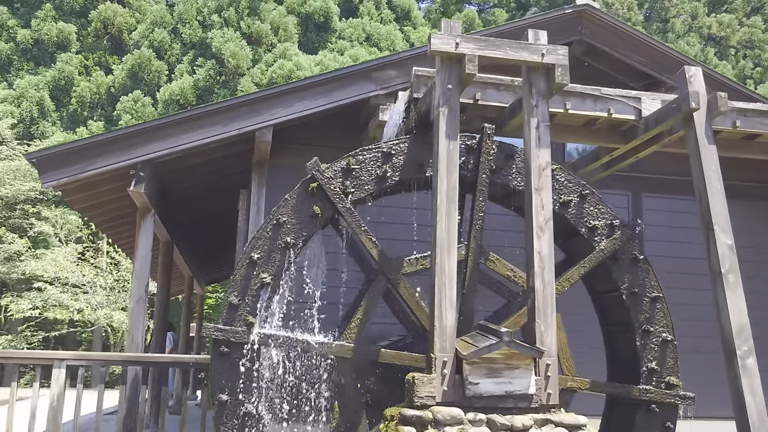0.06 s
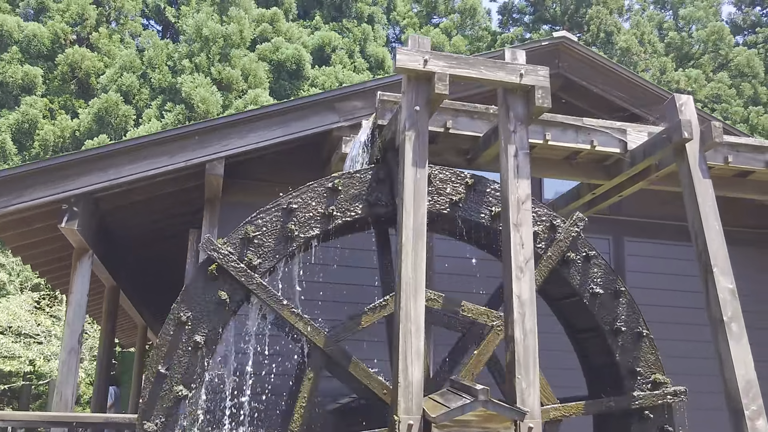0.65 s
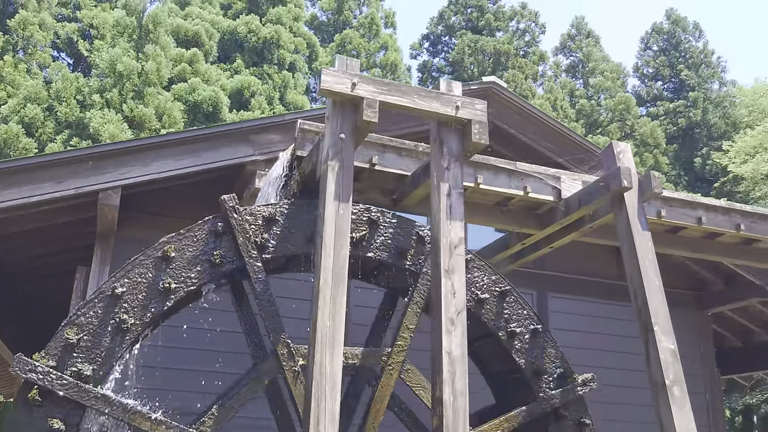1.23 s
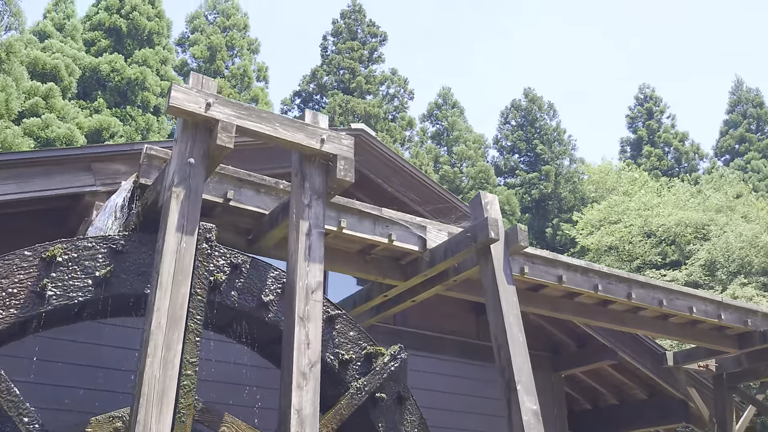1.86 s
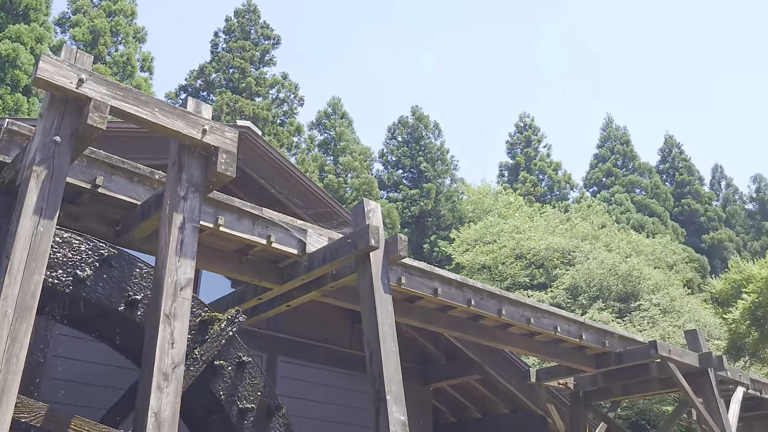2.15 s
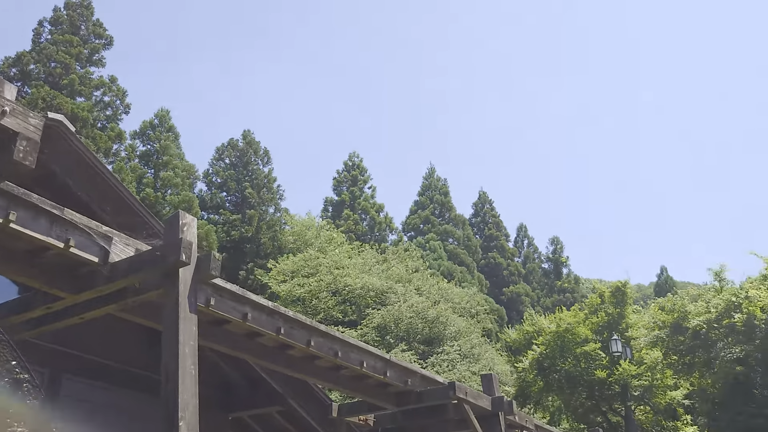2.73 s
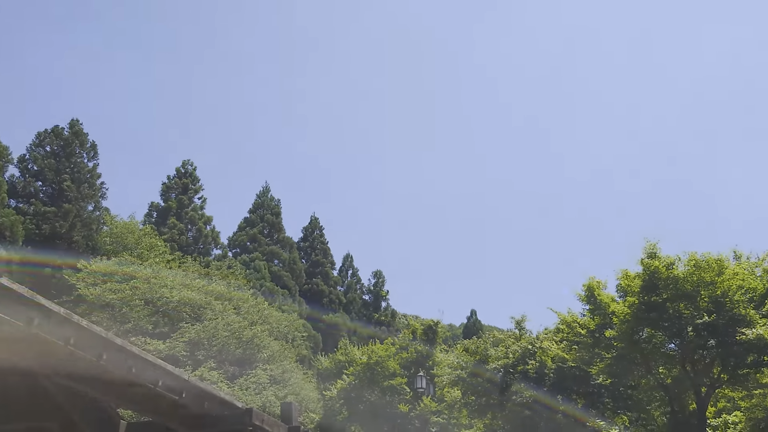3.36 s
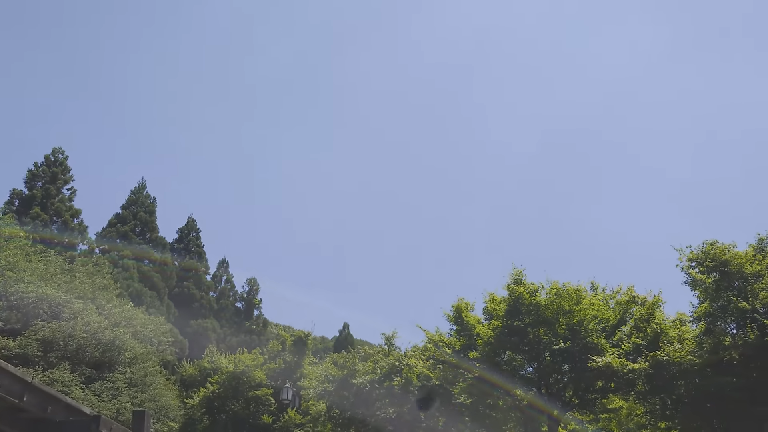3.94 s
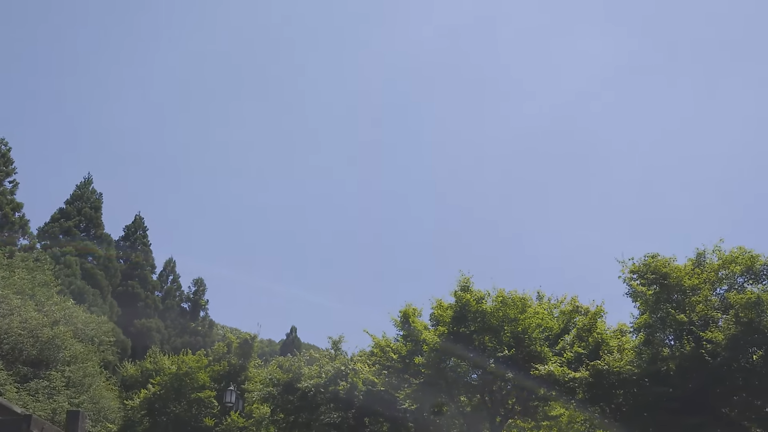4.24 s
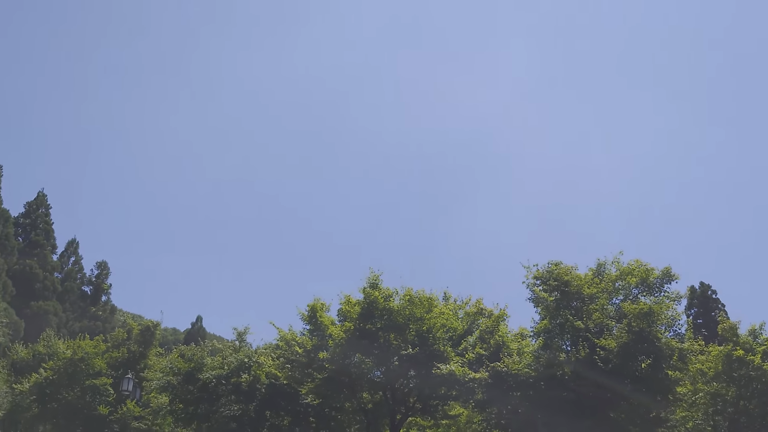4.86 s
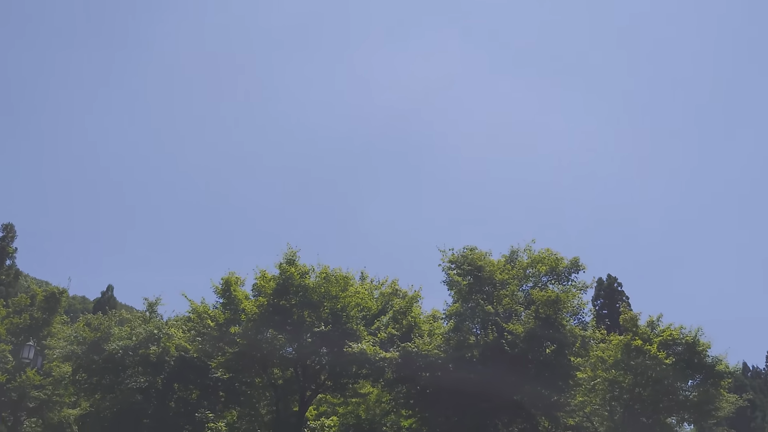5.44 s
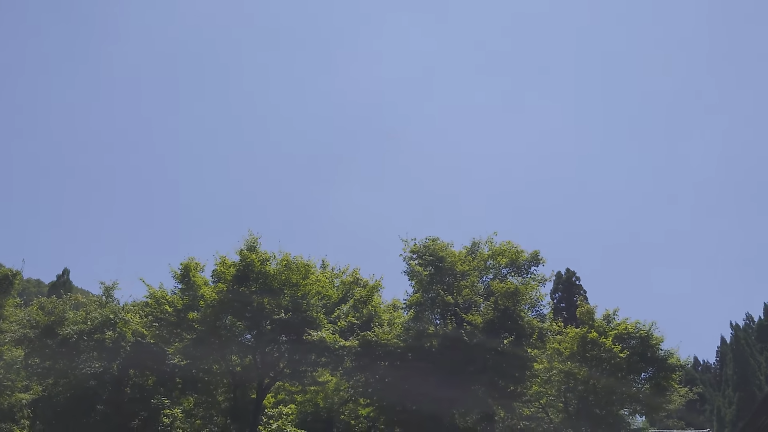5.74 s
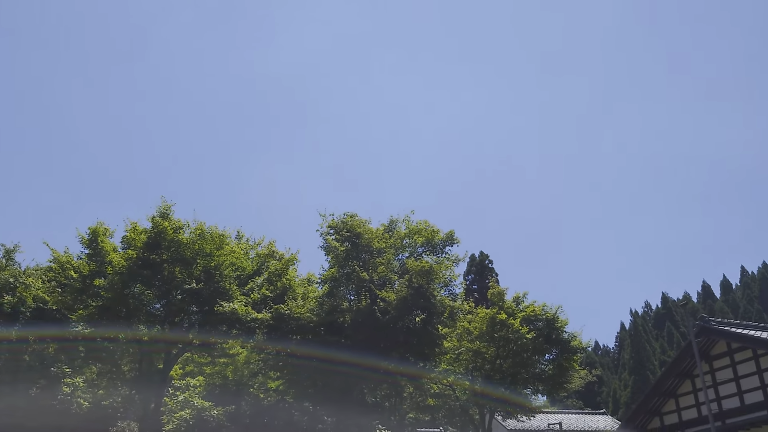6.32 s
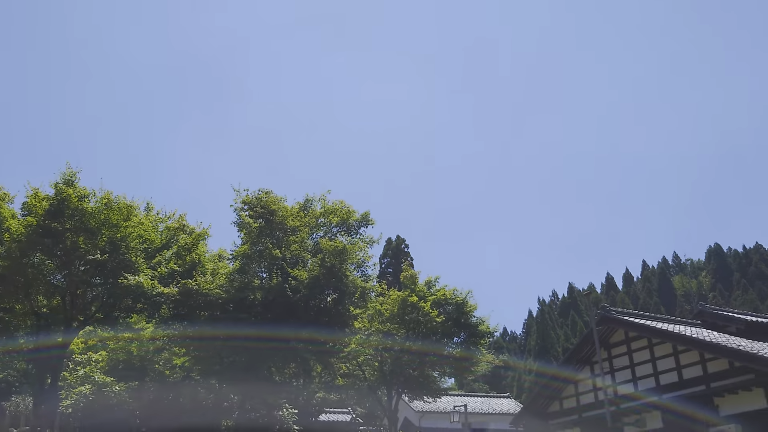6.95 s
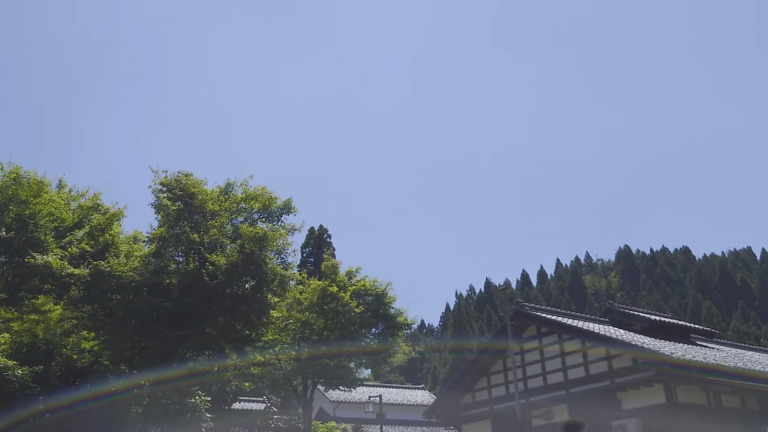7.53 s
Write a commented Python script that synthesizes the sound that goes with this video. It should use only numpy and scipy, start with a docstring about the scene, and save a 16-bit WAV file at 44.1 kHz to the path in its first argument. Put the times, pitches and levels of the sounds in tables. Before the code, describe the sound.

Water pours off a large wooden waterwheel outdoors, continuously for nearly eight seconds. It splashes and bubbles into a pool, with a bright hiss of pattering spray and a thin, tinkling trickle. Underneath, a channel rushes dully and gurgles, growing slightly fuller in the second half. Small slops and sharp, high drips on wet boards come irregularly, with the clearest drips near 1.6, 2.7, 2.9 and 7.2 seconds. The buckets spill brief gushes around 0.9 and 1.8 seconds, then the splashing and spray are strongest and brightest from about 2.3 to 3.2 seconds. The flow eases by 4 seconds, with smaller surges near 5 and 7. The microphone turns slowly right, so the water drifts left and changes slightly in tone. A light breeze rumbles on the microphone throughout, with soft puffs, the strongest at about 2.4 seconds and another at 3.5.

```python
"""Water pouring off a waterwheel

A large wooden wheel turns outdoors. Its buckets empty into a pool with bubbling splashes, a bright
spray of droplets and a few sharp drips, while the channel below rushes steadily. The microphone turns
slowly to the right, so the wheel drifts left. A breeze rumbles on its two ports (its sound openings)."""
import sys
import numpy as np
from scipy import signal
from scipy.fft import rfft, irfft
from scipy.io import wavfile

SR = 44100
rng = np.random.default_rng(int(sys.argv[2]) if len(sys.argv) > 2 else 0)


def wav_record(signal):
    """Record a signal, one row per channel, as 16-bit PCM in the file named by sys.argv[1]."""
    frames = np.transpose(np.atleast_2d(signal))
    bounded = np.clip(frames, -1, 1)
    # unit amplitude maps onto the largest positive 16-bit level
    quanta = np.round(bounded * 32767).astype(np.int16)
    wavfile.write(sys.argv[1], SR, quanta)


N = 339129
TIME = np.arange(N) / SR
HOP = 128  # samples from one short slice of sound (a frame) to the next
BIN_HZ = np.fft.rfftfreq(4 * HOP, 1 / SR)[:, None]
FRAME_S = np.arange(-(-N // HOP) + 1) * HOP / SR


def splashes(boost_db=2.5, bubble_db=-12, swell_db=0.6):
    """Ropes of water slap the pool in clumps and push bubbles under."""
    # tone of the splashing: frequency_hz, gain_db
    tone = [(350, -25), (700, -10), (1170, -15), (1450, -2), (2000, 1.5), (2500, 0), (3200, -9),
            (6600, -16.5)]
    slaps = amp(0.4 * patches(span_hz=900, span_s=0.061))
    froth = wash() + amp(bubble_db) * bubbles(1133, 2880, per_s=500, spread_db=-0.5, cycles=12.1,
                                              rise=0.0314)
    thickness_db = swell_db * wander(span_s=0.051)  # the ropes thicken and thin
    return poured(froth * slaps, tone, boost_db + flow(column=1) + thickness_db)


def slops(boost_db=4, rise_s=0.0054, decay_s=0.025, width_octaves=0.38):
    """A lump of water tips from a bucket into the pool: hollow when large, bright when small."""
    # lumps hitting the pool: start_s, level_db, pitch_hz
    lumps = [(.345, -41, 5200), (1.32, -37, 1530), (1.81, -38, 1900), (2.06, -38.5, 1720),
             (2.54, -37, 2000), (2.922, -38.5, 1710), (3.165, -41, 1820), (3.93, -39, 1950),
             (4.535, -37, 2090), (5.018, -36, 2120), (5.148, -37.5, 2180), (5.984, -37.5, 1910),
             (6.145, -45, 1950), (6.422, -36, 2040), (7.145, -43, 2000)]
    out = 0
    for start_s, level_db, pitch_hz in lumps:
        band = np.exp(-.5 * (np.log2((BIN_HZ + 1) / pitch_hz) / width_octaves) ** 2)
        froth = unit(sound(wash() * band))
        age = np.maximum(TIME - start_s, 0)
        envelope = (1 - np.exp(-age / rise_s)) * np.exp(-age / decay_s)
        out = out + amp(level_db + boost_db) * froth * envelope
    return out


def spray(boost_db=2.5, plink_db=-9, fizz_db=3):
    """Droplets patter and plink in small showers over the fine hiss of the mist."""
    # tone of the spray: frequency_hz, gain_db
    tone = [(750, -31.5), (1500, -14.5), (3200, -5.5), (4500, -5), (5300, -6), (6300, -2.5), (6950, 1.5),
            (7450, -1), (8000, -5.5), (8800, -7.5), (10500, -5), (13000, -8), (15500, -13.5)]
    clicks = unit(impacts(per_s=2400, spread_db=1.5, scatter_s=.00003))
    drops = spectra(clicks) * amp(3.3 * patches(span_hz=1490, span_s=0.02))
    shatter = fade_after(clicks ** 2, decay_s=0.0079)  # each drop breaks into a fizz of smaller ones
    fizz = unit(np.sqrt(shatter) * sound(wash()))
    plinks = bubbles(3866, 7360, per_s=800, spread_db=1, cycles=7.1, rise=0.005)
    mist = wash()
    patter = sound(drops + amp(plink_db) * plinks + mist) + amp(fizz_db) * fizz
    patter *= showers(per_s=55, decay_s=0.023, depth=0.16)
    return poured(spectra(patter), tone, boost_db + flow(column=2))


def drips(boost_db=3, splat_db=-6, attack_s=0.00016, settle_db=-23, settle_s=0.017):
    """A large drop hits the wet boards: a short ring, a puff of splatter, then droplets settling."""
    # large drops: start_s, level_db, pitch_hz, left_minus_right_db, ring_decay_s, splat_decay_s
    large_drops = [(0.118, -27, 4600, -3, 0.00047, .0007), (.4163, -32, 7000, 2, .0008, .001),
                   (1.0745, -34, 7300, -2, .0011, .002), (1.572, -19, 7670, -4, 0.00065, 0.0013),
                   (1.6423, -36, 4700, -8, .001, .001), (1.913, -32, 6900, -3, .0008, .0007),
                   (1.9688, -25, 5300, 20, 0.00068, .0004), (2.082, -33, 11000, -3, .001, .002),
                   (2.188, -26, 7300, -5, .0011, .003), (2.316, -28, 6600, -4, .0011, .004),
                   (2.399, -25, 4700, 4, 0.00095, 0.0006), (2.4955, -25, 4800, 3, .0014, .0007),
                   (2.658, -20.5, 6730, 2, 0.0017, .003), (2.77, -26, 4680, 3, .0016, .0005),
                   (2.868, -29, 4680, 3, .0016, .0005), (2.9395, -19, 7200, 0, 0.0023, .0045),
                   (3.052, -30, 4750, 0, .0016, .0005), (3.082, -33, 4650, 3, .0016, .0005),
                   (3.1402, -33, 4700, 2, .001, .001), (3.477, -27, 7000, 0, .0013, .002),
                   (3.573, -30, 4770, -3, .0022, .0005), (3.624, -24, 6900, -3, 0.0016, 0.00099),
                   (3.749, -34, 4550, 2, .0016, .0008), (3.7647, -25, 4800, -1, .001, .003),
                   (3.951, -28, 4900, 5, .0004, .0005), (4.0512, -29.5, 4200, 3, .0009, .001),
                   (4.3775, -25, 5770, 3, 0.00099, 0.0019), (4.496, -25, 6700, 6, .0011, .002),
                   (4.718, -32, 6290, 0, .0011, .002), (4.7995, -26, 6540, 3, .0011, .001),
                   (4.8315, -25, 4940, 19, 0.0015, 0.00054), (5.0303, -32, 6900, 4, .001, .001),
                   (5.5565, -35, 4900, -2, .0007, .0007), (6.025, -26.5, 4500, -2, 0.0013, .002),
                   (6.114, -25, 5000, 15, .0006, .0006), (6.3775, -29, 6100, 5, .0011, .001),
                   (6.9414, -26.5, 4200, -1, .0011, .0011), (7.064, -27.5, 6400, -3, .0008, .001),
                   (7.1074, -25, 6400, -2, .0008, .001), (7.221, -22.5, 6300, -10, .0011, .001),
                   (7.256, -22, 7800, -3, 0.00086, 0.0022)]
    t, out = np.arange(16 * HOP) / SR, np.zeros((2, N))
    bright = signal.butter(1, [4500, 15000], "band", fs=SR)
    for start_s, level_db, pitch_hz, pan_db, ring_s, splat_s in large_drops:
        ring = np.sin(2 * np.pi * pitch_hz * t) * np.exp(-t / ring_s)
        fade = amp(splat_db) * np.exp(-t / splat_s) + amp(settle_db) * np.exp(-t / settle_s)
        splat = unit(signal.lfilter(*bright, rng.standard_normal((2, len(t))))) * fade
        drop = (ring + splat) * (1 - np.exp(-(t / attack_s) ** 2))
        at = round(start_s * SR)
        out[:, at:at + len(t)] += drop / abs(drop).max() * amp(level_db + boost_db) * sides(pan_db)
    return out


def trickle(gain_db=-13):
    """Thin threads of water run off the rim as separate, ringing droplets."""
    tinkle = bubbles(4340, 4930, per_s=40, spread_db=-1, cycles=15, rise=0.002, count=8)
    return unit(sound(tinkle)) * amp(gain_db + flow(column=2))


def channel(gurgle_db=-14, swell_db=0.68):
    """Water rushes dully along the channel under the wheel, with large bubbles gurgling in it."""
    # tone of the rush: frequency_hz, gain_db
    tone = [(85, -14), (170, -14.5), (260, -18), (340, -4), (460, -3.5), (750, -1.5), (1100, 0.5),
            (1800, -3), (3200, -17.5), (6400, -11)]
    # slow drift in its loudness: time_s, level_db
    drift = [(0, -47.5), (1.1, -49), (2.3, -48.5), (3.8, -44), (6, -46), (7.69, -44.5)]
    churn = amp(0.96 * patches(span_hz=159, span_s=0.26))
    gurgle = bubbles(405.3, 1303, per_s=260, spread_db=2, cycles=16.3, rise=0.011)
    rush = (wash() + amp(gurgle_db) * gurgle) * churn
    return poured(rush, tone, curve(drift, TIME) + swell_db * wander(span_s=0.063))


def flow(column, rise_s=0.013, drain_s=0.033):
    """Level in dB of the splash (column 1) or spray (column 2): a steady fall plus brief gushes."""
    # the steady fall of water: time_s, splash_db, spray_db
    fall = [(0, -44, -45.5), (1.45, -42, -45.5), (2.15, -41.5, -42.5), (2.45, -43.5, -37.5),
            (2.8, -42, -36), (3.3, -43, -39.5), (3.8, -43.5, -40.5), (4.2, -45, -46.5), (4.7, -45, -43),
            (5.45, -45.5, -42.5), (6.75, -44.8, -43.5), (7.69, -43.5, -43)]
    # a bucket spills more than usual: start_s, length_s, extra_splash_db, extra_spray_db
    gushes = [(0.844, 0.12, 4, 1.5), (1.062, .05, 1.5, 2.5), (1.608, 0.08, 2.5, 2.5), (1.784, .09, 5.5, 2),
              (2.246, 0.075, 3.5, 4), (2.326, 0.34, 4.5, 1), (2.792, 0.2, 4, 3), (3.03, .05, 2.5, 2.5),
              (3.124, 0.075, 3.5, 1.5), (3.698, 0.07, 2, 2.5), (4.38, 0.19, 0, 2.5), (4.455, 0.07, 2, 4),
              (4.846, 0.36, 2.7, 3), (5.01, 0.062, 1, 2), (6.012, 0.26, 1.2, 2), (6.346, 0.067, -0.5, 3),
              (6.57, 0.03, 3.5, 3), (7.016, 0.51, 2, 2.5), (7.32, 0.14, 3, 1)]
    level_db = curve(fall, TIME, column)
    for start_s, length_s, *extra_db in gushes:
        arrive = 1 - np.exp(-np.maximum(TIME - start_s, 0) / rise_s)
        drain = np.exp(-np.maximum(TIME - start_s - length_s, 0) / drain_s)
        level_db = level_db + extra_db[column - 1] * arrive * drain
    return level_db


def bubbles(low_hz, high_hz, per_s, spread_db, cycles, rise, count=16):
    """Trapped air rings for a few cycles and rises in pitch as it nears the surface; gives spectra."""
    t, out = np.arange(16 * HOP) / SR, 0
    for hz in np.geomspace(low_hz, high_hz, count):
        age = t * hz / cycles
        ring = np.exp(-age) * np.sin(2 * np.pi * hz * t * (1 + rise * age))
        births = impacts(per_s / count, spread_db, scatter_s=.00008)
        out = out + signal.oaconvolve(births, unit(ring)[None], axes=1)[:, :N]
    return spectra(unit(out))


def impacts(per_s, spread_db, scatter_s):
    """Clicks of random size; each lands in its own place, so it has its own delay between the ports."""
    at = np.flatnonzero(rng.random(N) < per_s / SR)
    size = amp(spread_db * np.minimum(rng.exponential(1, N), 5)) * rng.choice([-1, 1], N)
    lag = np.round(scatter_s * SR * rng.standard_normal(N)).astype(int)
    return np.array([np.bincount(at, size[at], N), np.bincount((at + lag[at]) % N, size[at], N)])


def showers(per_s, decay_s, depth):
    """A gain for water landing in clumps: each starts at once and dribbles away."""
    starts = (rng.random(N) < per_s / SR) * rng.exponential(1, N)
    return np.sqrt(1 + depth * fade_after(starts, decay_s))


def wash():
    """Countless drops merge into an even hiss, partly alike at the two ports; gives spectra."""
    # how alike the ports hear sound scattered by the yard: frequency_hz, likeness (0 to 1)
    likeness = [(100, 1), (400, 0.94), (800, 0.47), (1300, 0.59), (2000, 0.57), (2900, 0.33), (4200, 0.12),
                (6400, 0.1), (8000, 0.13), (11000, 0.2), (15000, 0.1)]
    left, other = spectra(rng.standard_normal((2, N)))
    same = across(likeness)
    return np.array([left, same * left + np.sqrt(1 - same ** 2) * other])


def poured(texture, tone, level_db):
    """Turns a water texture's spectra into sound with the given tone and changing level."""
    return unit(sound(texture * amp(across(tone)))) * amp(level_db)


def turning_microphone(water, port_gap_s=0.000497):
    """The far port hears the wheel later, and the microphone's body shades each port as it turns."""
    # where the wheel stands: time_s, degrees_to_the_left, left_minus_right_db
    path = [(0, 2.4, 3), (.8, 10.3, 1.5), (1.2, 12.4, 1), (1.7, 17, 0.5), (2.3, 53, -0.5), (3.65, 70, -1),
            (4.3, 92, 0.5), (6, 112, 0.3), (7, 118.5, -1), (7.7, 144, -4)]
    # four directions of the wheel: degrees_to_the_left
    angles = [15, 68, 100, 132]
    # bands the body lifts or dulls at each port: centre_hz, width_hz, gain_db at each of the four angles
    left_bands = [(513, 33, 7, 0.5, 3, 3), (1240, 250, 4, 2.5, -2, 3.5), (2480, 560, -6, -4, -5.5, -9.5),
                  (2850, 110, 2, 2, 0.5, 0), (3300, 270, 1.5, -0.5, 2.5, 5), (6040, 430, 1.5, 2, 4, 5.5),
                  (6850, 340, -1, 4.5, 1.5, 0.5), (7830, 450, -0.5, -4, -3, -4),
                  (8630, 280, -2.5, 4.5, -5.5, -4), (8970, 160, 4, -1, 6.5, -2),
                  (11300, 690, -5.5, -1.5, 0, -1.5), (13100, 1300, -0.8, 2.0, 3.5, 2)]
    right_bands = [(513, 40, 6.5, -5.5, 4.5, -1.5), (780, 420, 2, 1, 1.0, -2), (2020, 430, -8, 0, 2.5, 0.5),
                   (2840, 680, -0.5, -4.5, 0, -1.4), (3750, 470, 2, -1, 2, 3), (5780, 420, 4, -2.5, 3.5, 4),
                   (6960, 420, -2, 0.5, -8.5, -6), (8000, 510, 5, 3.5, 8.5, 5.5),
                   (9470, 710, -3, -4.5, -10.5, -5.5), (12340, 1470, -2, -3.5, -5, -10.5),
                   (13700, 830, 1, -6, 4.5, 5)]
    angle = curve(path, FRAME_S)
    shade_db = np.array([notch(column=1), notch(column=3)])
    for port, bands in enumerate((left_bands, right_bands)):
        for hz, width_hz, *gains_db in bands:
            shade_db[port] += bump(hz, width_hz) * np.interp(angle, angles, gains_db)
    lag_s = port_gap_s * np.sin(np.radians(angle))
    lead = np.exp(1j * np.pi * BIN_HZ * lag_s)  # left is half the lag early, right half the lag late
    heard = sound(spectra(water) * amp(shade_db) * np.array([lead, 1 / lead]))
    return heard * sides(curve(path, TIME, column=2))


def notch(column, width_hz=480):
    """A narrow dip in dB, probably from a nearby echo, climbs the treble as the microphone tilts."""
    # path of the dip: time_s, left_hz, left_db, right_hz, right_db
    sweep = [(.3, 6100, -1, 7000, -1.5), (.8, 7000, 1, 7900, -1), (1.3, 7600, -1, 10400, -2),
             (1.55, 7950, -10, 12400, -12), (1.9, 8500, -13, 13500, -11), (2.2, 12600, -5, 13700, 0),
             (2.9, 14300, -4, 14500, 0), (3.9, 15000, -2, 15500, -4.5), (5.5, 15500, 1, 15900, -6)]
    return curve(sweep, FRAME_S, column + 1) * bump(curve(sweep, FRAME_S, column), width_hz)


def breeze(boost_db=9.5, gust_db=3, puff_boost_db=2):
    """Moving air rumbles softly on each port, with small gusts and a few harder puffs."""
    # strength of the breeze: time_s, level_db
    strength = [(0, -61.5), (1.15, -69.5), (1.5, -66.5), (2.1, -67.5), (2.4, -58.5), (3.1, -65.5),
                (3.5, -65), (3.9, -68), (5.4, -69), (7.2, -65.5), (7.69, -70)]
    # swirls that thump the microphone: peak_s, level_db, half_length_s, left_minus_right_db, speed_ratio
    puffs = [(0.61, -50, 0.023, 4, 1.2), (1.124, -52, 0.16, -7, 1.0), (2.26, -51, 0.031, -12, 1.5),
             (2.365, -41, 0.033, 2, 2.1), (2.4, -45, 0.035, 4, 1.2), (2.6, -50.5, 0.032, -12, 1.7),
             (3.505, -46.5, 0.046, 11, 1.05), (4.538, -48.5, 0.019, 20, 1.9), (5.959, -51, 0.036, -19, 2.2),
             (7.215, -50, 0.065, -5, 1.1)]
    gusts = np.array([wander(span_s=0.095) for _ in range(2)])
    out = eddies(speed_ratio=1) * amp(curve(strength, TIME) + boost_db + gust_db * gusts)
    for peak_s, level_db, half_length_s, pan_db, speed_ratio in puffs:
        passing = np.exp(-((TIME - peak_s) / half_length_s) ** 2)
        puff = unit(eddies(speed_ratio) * passing * sides(pan_db))
        out = out + puff * np.sqrt(np.mean(passing ** 2)) * amp(level_db + puff_boost_db)
    return out


def eddies(speed_ratio):
    """Swirling air makes a separate rumble at each port; faster air rumbles higher."""
    # tone of the breeze: frequency_hz, gain_db
    tone = [(8, -4.5), (22, 5), (45, -4.5), (100, -10.5), (180, -28.5), (300, -27), (700, -59)]
    hz, gain_db = np.transpose(tone)
    gains = amp(np.interp(np.log(np.fft.rfftfreq(N, 1 / SR) + 1), np.log(hz * speed_ratio), gain_db))
    return unit(irfft(rfft(rng.standard_normal((2, N))) * gains, N))


def patches(span_hz, span_s):
    """A smooth random pattern of highs and lows over frequency and time."""
    field = np.fft.rfft2(rng.standard_normal((320, 3072)))
    per_hz = np.fft.fftfreq(len(field), SR / (4 * HOP))[:, None]
    per_s = np.linspace(0, SR / HOP / 2, field.shape[1])
    blur = np.exp(-2 * ((per_hz * span_hz) ** 2 + (per_s * span_s) ** 2))
    return unit(np.fft.irfft2(field * blur)[:len(BIN_HZ), :len(FRAME_S)])


def wander(span_s):
    """A slow random rise and fall."""
    hz = np.fft.rfftfreq(N, 1 / SR)
    return unit(irfft(rfft(rng.standard_normal(N)) * np.exp(-2 * (hz * span_s) ** 2), N))


def fade_after(pulses, decay_s):
    """Gives every pulse a fading tail."""
    return signal.lfilter([1], [1, -np.exp(-1 / (decay_s * SR))], pulses)


def bump(centre_hz, width_hz):
    """A bell shape over frequency."""
    return np.exp(-.5 * ((BIN_HZ - centre_hz) / width_hz) ** 2)


def sides(pan_db):
    """Left and right gains that keep the total power; positive leans left."""
    gains = amp(np.array([[1], [-1]]) * pan_db / 2)
    return gains / np.sqrt(np.mean(gains ** 2, axis=0))


def curve(rows, t, column=1):
    """One column of a time table, joined by straight lines."""
    rows = np.asarray(rows)
    return np.interp(t, rows[:, 0], rows[:, column])


def across(points):
    """A frequency table read at every BIN_HZ, on a log scale."""
    hz, value = np.transpose(points)
    return np.interp(np.log(BIN_HZ + 1), np.log(hz + 1), value)


def spectra(x):
    """Splits sound into the frequencies of each frame: (ports, frequencies, frames)."""
    return signal.stft(x, nperseg=4 * HOP, noverlap=3 * HOP)[2]


def sound(frames):
    """Joins spectra back into sound."""
    return signal.istft(frames, nperseg=4 * HOP, noverlap=3 * HOP)[1][..., :N]


def amp(db):
    """Decibels to gain."""
    return 10 ** (np.asarray(db) / 20)


def unit(x):
    """Scales to an average power of 1."""
    return x / np.sqrt(np.mean(abs(x) ** 2) + 1e-20)


def scene():
    """All the water comes from the wheel; the breeze is on the microphone itself."""
    water = channel() + splashes() + slops() + spray() + trickle() + drips()
    return turning_microphone(water) + breeze()


def record(dry, cutoff_hz=15900):
    """Cuts off the very highest treble."""
    low_pass = signal.firwin(601, cutoff_hz, window=("kaiser", 8), fs=SR)
    return signal.oaconvolve(dry, low_pass[None], "same")


dry = scene()
out = record(dry)
wav_record(out)
```